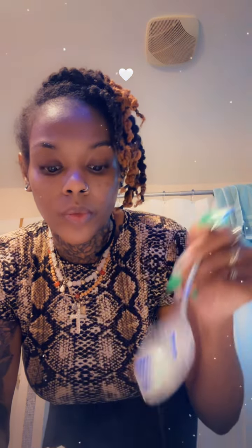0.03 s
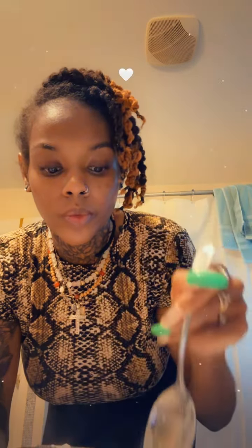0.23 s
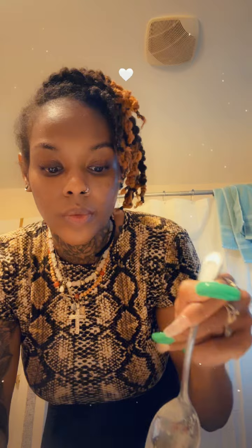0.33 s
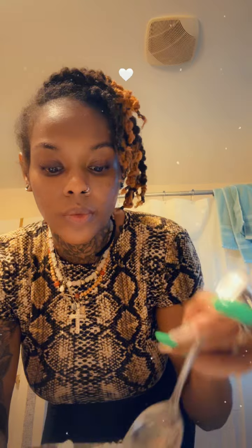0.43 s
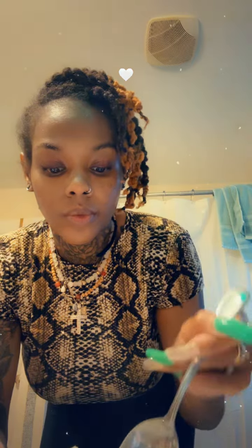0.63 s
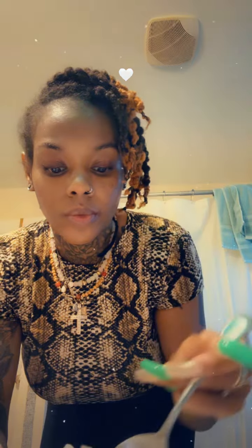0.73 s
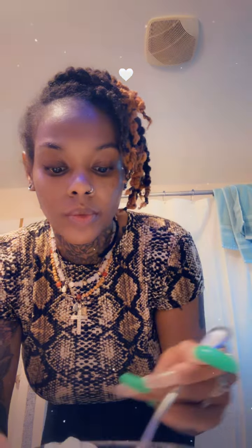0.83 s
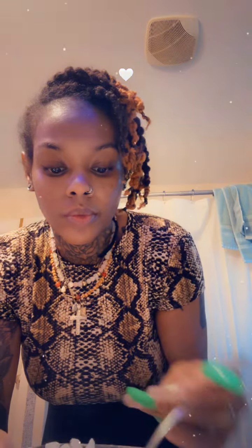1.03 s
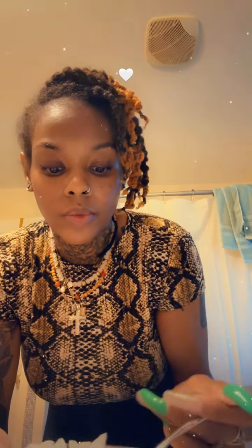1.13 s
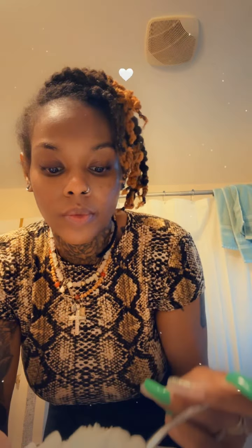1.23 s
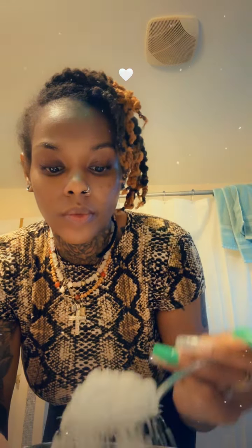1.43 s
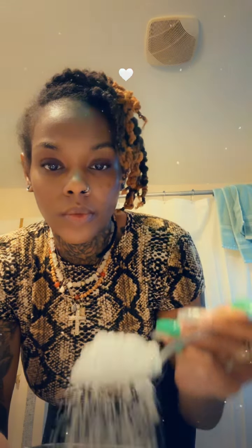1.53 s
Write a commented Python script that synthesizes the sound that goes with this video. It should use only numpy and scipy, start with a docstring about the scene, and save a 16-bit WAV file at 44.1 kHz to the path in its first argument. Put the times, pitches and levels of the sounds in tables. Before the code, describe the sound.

A spoon scoops fine powder from a bowl, heard close in a small, hard-walled room. It lands with a soft thud at 0.2 seconds, then digs with a gritty crunch in two strokes, around 0.4 and from 0.7 to 0.9 seconds. From 1 second it lifts with quieter rustling and small snaps, ending near 1.5 seconds in a thin hiss of falling powder. A faint low rumble lies underneath.

```python
"""In a small hard-walled room, a spoon is pushed into a bowl of fine powder, heard from close by.
It lands with a soft thud, an impact that excites damped modes, and digs in two strokes: grains rub
by stick-slip friction, packed powder crunches and shears, and lumps snap by brittle fracture.
Then it lifts a heap, with a few last snaps and a thin hiss of powder running off.
The bowl resonates faintly and the walls reverberate, over a low steady rumble."""
import sys
import numpy as np
from scipy import signal
from scipy.io import wavfile

SR = 44100
rng = np.random.default_rng(int(sys.argv[2]) if len(sys.argv) > 2 else 0)


def bounce(signal):
    """Save signal as a 16-bit WAV file at the path given by the first command-line argument."""
    frames = np.transpose(np.atleast_2d(signal))
    limited = np.clip(frames, -1, 1)
    pcm = np.round(limited * 32767).astype(np.int16)
    wavfile.write(sys.argv[1], SR, pcm)


N = 70560
T = np.arange(N) / SR


def amp(db):
    """Decibels to amplitude ratio."""
    return 10 ** (np.asarray(db) / 20)


def unit_rms(x):
    """Normalisation to rms 1."""
    return x / np.sqrt(np.mean(x ** 2) + 1e-20)


def envelope(curve):
    """Amplitude over time from (t/s, level/dB) points."""
    return amp(np.interp(T, *np.transpose(curve)))


def at_frequency(points, hz):
    """Interpolation on a logarithmic frequency axis."""
    f, value = np.transpose(points)
    return np.interp(np.log(hz + 1), np.log(f + 1), value)


def add(mix, start_s, sound):
    """Superposition of a sound on the mix."""
    part = mix[max(round(start_s * SR), 0):][:len(sound)]
    part += sound[:len(part)]


def colour(x, spectrum, size=4096):
    """Spectral shaping by a minimum-phase filter of unit energy."""
    hz = abs(np.fft.fftfreq(size, 1 / SR))
    log_gain = np.log(amp(at_frequency(spectrum, hz)))
    response = np.exp(np.conj(signal.hilbert(log_gain)))
    kernel = np.fft.ifft(response).real[:size // 2]
    return signal.fftconvolve(x, kernel / np.linalg.norm(kernel))[:N]


def highpass(x, hz):
    """Second-order bass roll-off."""
    return signal.sosfilt(signal.butter(2, hz, "high", fs=SR, output="sos"), x)


def impulses(per_s, spread_db):
    """Shot noise: random impulses of either sign, many small and a few large."""
    strength = amp(spread_db * np.minimum(rng.exponential(1, N), 4))
    return strength * rng.choice([-1., 1.], N) * (rng.random(N) < per_s / SR)


def pop(hz, rise_s, size=4096):
    """Heavily damped oscillation whose envelope peaks at rise_s."""
    t = T[:size]
    return (t / rise_s * np.exp(1 - t / rise_s)) ** 2 * np.sin(2 * np.pi * hz * t)


# Spectrum of the room's background (f/Hz, relative level/dB)
RUMBLE_SPECTRUM = [(20, -4), (40, -6.5), (65, 3.5), (110, -3.5), (150, -5.5), (220, -4), (400, -16),
                   (1000, -25), (4000, -47), (16000, -33)]
def rumble():
    """Stationary noise, its power concentrated in the bass."""
    return amp(-59) * unit_rms(colour(rng.standard_normal(N), RUMBLE_SPECTRUM))


# Friction envelope (t/s, level/dB) and spectrum (f/Hz, relative level/dB)
RUB_ENVELOPE = [(0, -67.5), (.055, -73), (.09, -63), (.125, -73), (.208, -61.5), (.212, -30.5), (.255, -27),
                (.29, -37), (.335, -48), (.385, -27.5), (.43, -26.5), (.462, -20), (.5, -27.5), (.55, -37),
                (.635, -29), (.695, -36.5), (.73, -24), (.765, -23.5), (.805, -26.5), (.865, -20.5),
                (.905, -26), (.945, -35), (.985, -38.5), (1.018, -34), (1.056, -38), (1.116, -34),
                (1.16, -41.5), (1.245, -43.5), (1.285, -36.5), (1.35, -36), (1.43, -41), (1.495, -50),
                (1.6, -54)]
RUB_SPECTRUM = [(30, -62), (180, -18.5), (320, -19), (600, -6.5), (1050, -4.5), (1600, 4.5), (2300, 3.5),
                (3200, 2), (4700, 2), (6200, -1), (7800, -1.5), (10500, -16), (13000, -13.5), (16000, -12)]
def rubbing():
    """Stick-slip friction: grains catch and slip on the spoon in dense, tiny impulses."""
    slips = impulses(per_s=8200, spread_db=3)
    return envelope(RUB_ENVELOPE) * unit_rms(colour(slips, RUB_SPECTRUM))


# Single grain impacts (t/s, level/dB) and their spectrum (f/Hz, relative level/dB)
GRAIN_IMPACTS = [(.162, -47), (0.18, -48.5), (0.192, -54), (1.022, -29), (1.183, -27), (1.2582, -22),
                 (1.2782, -23)]
TICK_SPECTRUM = [(300, -17), (1500, -8), (2600, 2), (7000, 3), (10500, -8.5), (15500, -9)]
def ticking(decay_s=.0016, size=1024):
    """Hard impact: a grain's brief contact with the metal gives a bright, broadband burst."""
    bursts = np.zeros(N)
    for start_s, db in GRAIN_IMPACTS:
        add(bursts, start_s, amp(db) * rng.standard_normal(size) * np.exp(-T[:size] / decay_s))
    return colour(bursts, TICK_SPECTRUM)


# Breaking lumps (t/s, f/Hz, pop level/dB, crack level/dB); crack spectrum (f/Hz, relative level/dB)
FRACTURES = [(.2092, 1380, -14, -18.5), (.351, 1630, -24.5, -29), (0.4049, 1380, -10, -20),
             (0.4088, 1490, -20.5, -29), (0.4529, 1500, -10.5, -21), (.584, 1590, -18, -26),
             (.701, 2060, -22, -20), (0.7242, 2040, -10.5, -18), (0.7264, 2050, -8, -14),
             (.731, 1640, -4.5, -17), (0.8274, 1590, -10, -19), (0.857, 1520, -22, -40),
             (1.015, 2000, -25, -32), (1.169, 1550, -15.5, -33), (1.2295, 2010, -23, -26),
             (1.2587, 1370, -11.5, -31), (1.2779, 1120, -45, -27.5), (1.2854, 1550, -17.5, -31),
             (1.3015, 1550, -22, -35), (1.3078, 1740, -24, -30.5), (1.3284, 1250, -21, -27),
             (1.416, 1540, -22, -30)]
CRACK_SPECTRUM = [(100, -37), (400, -16.5), (900, -3.5), (2000, 4.5), (3300, 2.5), (4900, 3), (7500, -3.5),
                  (10500, -15.5), (16000, -22)]
def snapping(crack_s=.0036, size=4096):
    """Brittle fracture: a lump releases its strain energy as a pop and a gritty crack."""
    pops, cracks = np.zeros((2, N))
    crack_decay = np.exp(-(T[:size] / crack_s) ** 2)
    for start_s, hz, pop_db, crack_db in FRACTURES:
        add(pops, start_s, amp(pop_db) * pop(hz, rise_s=.00084))
        add(cracks, start_s, amp(crack_db) * rng.standard_normal(size) * crack_decay)
    return pops + colour(cracks, CRACK_SPECTRUM)


# Spoon pushes (t/s, knock level/dB, bump level/dB); knock modes (f/Hz, relative level/dB, T60/s)
PUSHES = [(.2105, -12, -32), (.26, -27, -60), (0.411, -26, -31.5), (0.447, -21, -41), (.731, -24, -39)]
KNOCK_MODES = [(210, -22.5, 0.17), (326, -13, 0.12), (502, 5, 0.034), (579, 7, 0.027), (679, 12.5, 0.013),
               (800, -27, 0.018)]
def thudding(knock_rise_s=.0018, bump_lag_s=.00855):
    """Impact excitation: each push sets the full bowl's damped modes going, then bumps the table."""
    modes = sum(amp(db - 60 * T / t60) * np.sin(2 * np.pi * hz * T) for hz, db, t60 in KNOCK_MODES)
    knock = (1 - np.exp(-T / knock_rise_s)) * modes
    knock /= abs(knock).max()
    thuds = np.zeros(N)
    for start_s, knock_db, bump_db in PUSHES:
        add(thuds, start_s, amp(knock_db) * knock)
        add(thuds, start_s + bump_lag_s, amp(bump_db) * pop(hz=82.5, rise_s=.0027))
    return thuds


# Envelope of the crunch under the spoon's pressure (t/s, level/dB)
CRUNCH_ENVELOPE = [(0, -95), (.208, -85), (.214, -30), (.26, -31), (.325, -72), (.41, -24), (.435, -30),
                   (.458, -19), (.48, -24), (.54, -50), (.645, -28), (.695, -40.5), (.735, -29),
                   (.8, -28.5), (.83, -33.5), (.89, -27), (.96, -47.5), (1.11, -39), (1.22, -49),
                   (1.3, -35), (1.375, -42.5), (1.46, -53), (1.6, -61)]
def crunching(per_s=1400, centre_hz=1690, spread_octaves=.27, rise_cycles=.93, pitch_count=24):
    """Compaction: packed powder yields in small pops of scattered pitch."""
    pitches = centre_hz * 2 ** (spread_octaves * unit_rms(np.linspace(-1, 1, pitch_count)))
    pops = np.zeros(N)
    for hz in pitches:
        collapses = impulses(per_s / pitch_count, spread_db=2.5)
        pops += signal.oaconvolve(collapses, pop(hz, rise_cycles / hz))[:N]
    return envelope(CRUNCH_ENVELOPE) * unit_rms(highpass(pops, hz=690))


# Shear envelope (t/s, level/dB) and spectrum before the bass roll-off (f/Hz, relative level/dB)
GRIND_ENVELOPE = [(0, -76), (.208, -87), (.216, -41), (.265, -44.5), (.34, -52), (.41, -36.5), (.46, -34),
                  (.55, -52), (.635, -42.5), (.7, -43.5), (.74, -34), (.79, -41), (.835, -33), (.88, -44.5),
                  (.96, -55.5), (1.1, -47), (1.22, -51.5), (1.34, -44.5), (1.45, -56), (1.6, -63)]
GRIND_SPECTRUM = [(40, -47), (100, -29), (170, -13), (260, -3.5), (330, -6.5), (450, -7), (580, -3.5),
                  (820, 0.5), (1050, -10), (2000, -18), (6000, -43)]
def grinding():
    """Granular shear: the bulk of the powder shifts in dull, closely spaced slips."""
    slips = colour(impulses(per_s=2500, spread_db=2.5), GRIND_SPECTRUM)
    return envelope(GRIND_ENVELOPE) * unit_rms(highpass(slips, hz=320))


# Run-off envelope (t/s, level/dB) and spectrum (f/Hz, relative level/dB)
SIFT_ENVELOPE = [(0, -82), (.2, -76), (.33, -66), (.39, -46), (.47, -50), (.55, -65), (.7, -56),
                 (.78, -49.5), (.845, -35), (.9, -33), (.96, -68), (1.02, -54), (1.22, -59), (1.32, -58),
                 (1.44, -47), (1.5, -53), (1.6, -50)]
SIFT_SPECTRUM = [(300, -52), (2000, -12), (6000, -18), (10500, -7), (12700, -2), (15000, 6), (16000, -2)]
def sifting():
    """Incoherent summation: the patter of powder running off the spoon merges into a thin hiss."""
    patter = impulses(per_s=3400, spread_db=1.5)
    return envelope(SIFT_ENVELOPE) * unit_rms(colour(patter, SIFT_SPECTRUM))


# Modes of the bowl (f/Hz, relative energy level/dB, T60/s)
BOWL_MODES = [(490, -5, .2), (572, 2, .25), (691, -3, .2), (805, -1, .25), (935, 2, .14), (1265, 1, .2),
              (1345, -3, .15), (1442, -1, .15), (1524, -2, .2), (1566, -1, .18), (1624, -3, .15),
              (1735, -2, .15), (1900, -3, .12), (2056, -2, .12), (2188, -3, .12), (2393, -3, .1)]
def bowl(x, coupling_db=-63):
    """Resonance: a sound drives the bowl's modes, which add a faint ring to it."""
    ring = sum(amp(db - 60 * T / t60) * np.cos(2 * np.pi * hz * T) / np.sqrt(t60)
               for hz, db, t60 in BOWL_MODES)
    return x + amp(coupling_db) * signal.fftconvolve(x, ring)[:N]


# Reverberation time of the room (f/Hz, T60/s)
REVERB_TIMES = [(150, 0.67), (500, .5), (1500, 0.37), (4000, 0.15), (8000, 0.19), (15000, 0.31)]
def reverberation(x, echoes_per_s=5000, first_echo_s=.002, size=22050):
    """Diffuse reflection: dense echoes from near walls, the treble decaying before the bass."""
    echoes = rng.standard_normal(size) * (rng.random(size) < echoes_per_s / SR)
    echoes *= T[:size] > first_echo_s
    hz, t, bands = signal.stft(echoes, SR, nperseg=256)
    decay = amp(-60 * t / at_frequency(REVERB_TIMES, hz)[:, None])
    tail = signal.istft(bands * decay, SR, nperseg=256)[1]
    return signal.fftconvolve(x, tail / np.linalg.norm(tail))[:N]


def scene():
    """Superposition of direct sound, reverberant field and background, in mono."""
    rub, crunch, grind = bowl(rubbing()), bowl(crunching()), bowl(grinding())
    transients = bowl(snapping()) + ticking() + thudding()
    into_room = amp(-10.5) * rub + amp(-12) * crunch + amp(-6) * grind + amp(-7) * transients
    room_sound = reverberation(into_room) + rumble()
    direct = rub + crunch + grind + transients + sifting()
    return (direct + room_sound)[None]


def record(dry):
    """Band limiting: the deepest bass and the highest treble are filtered out."""
    lowpass = signal.firwin(255, 16000, window=("kaiser", 9), fs=SR)
    return signal.oaconvolve(highpass(dry, hz=35), lowpass[None], "same")


dry = scene()
out = record(dry)
bounce(out)
```